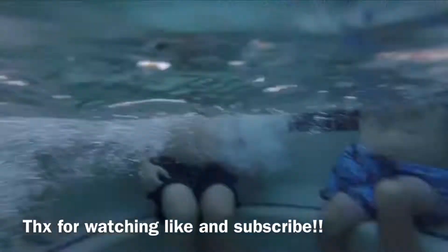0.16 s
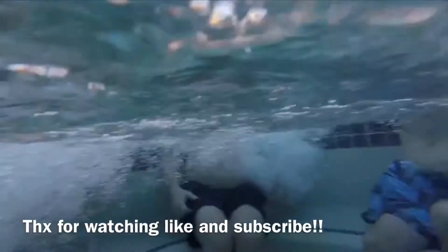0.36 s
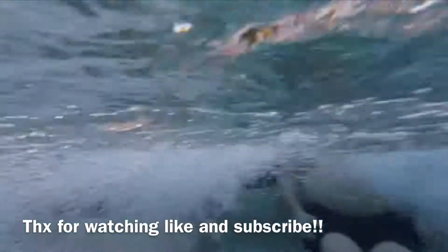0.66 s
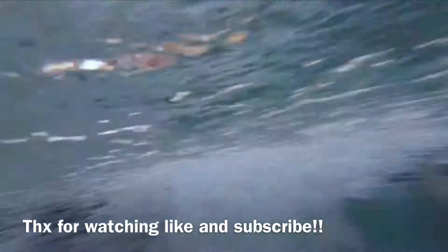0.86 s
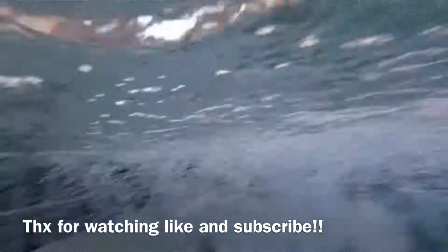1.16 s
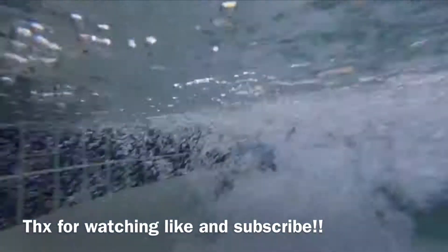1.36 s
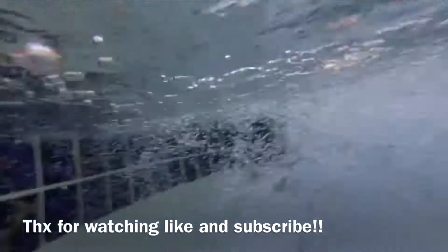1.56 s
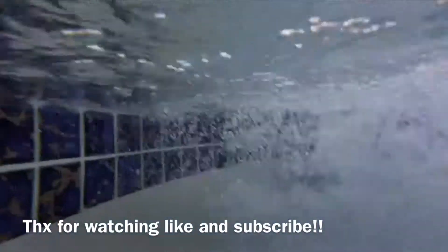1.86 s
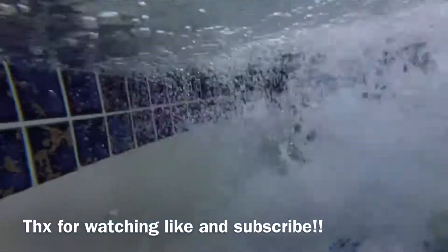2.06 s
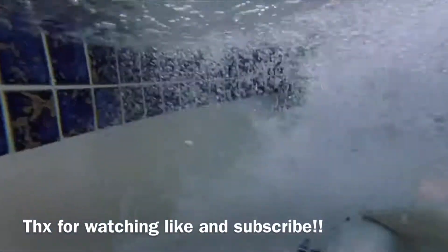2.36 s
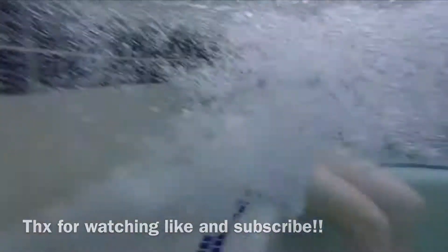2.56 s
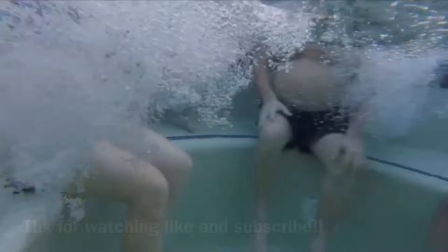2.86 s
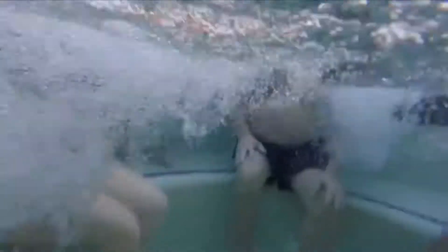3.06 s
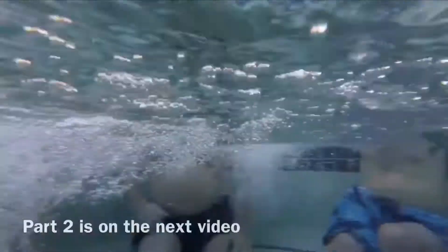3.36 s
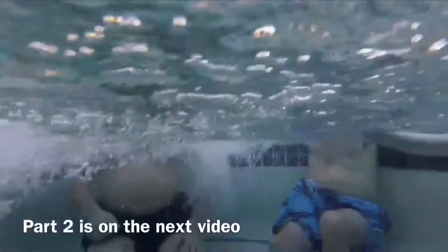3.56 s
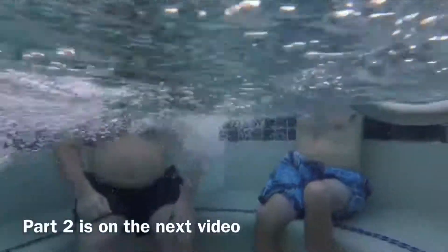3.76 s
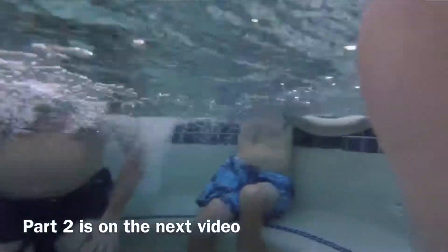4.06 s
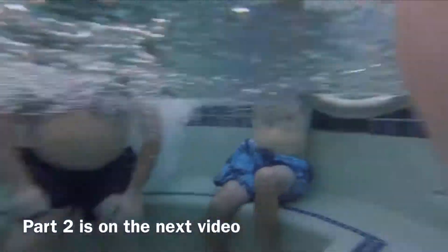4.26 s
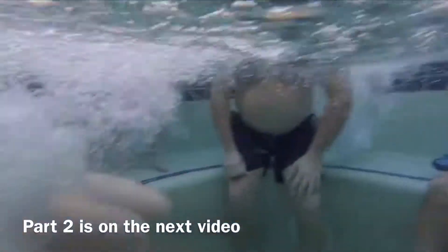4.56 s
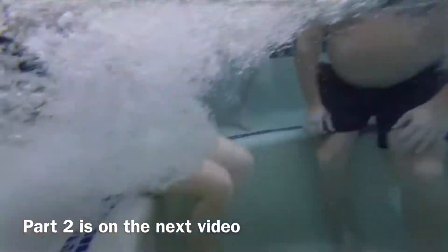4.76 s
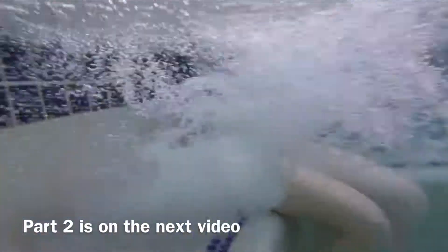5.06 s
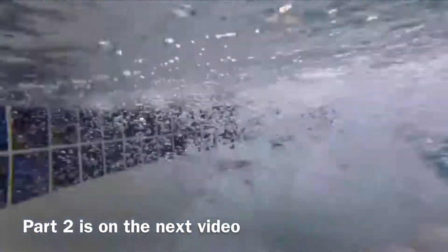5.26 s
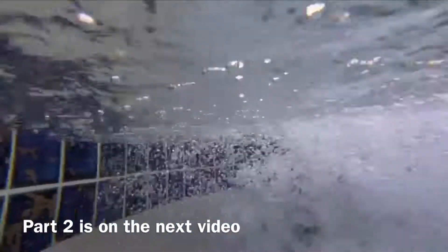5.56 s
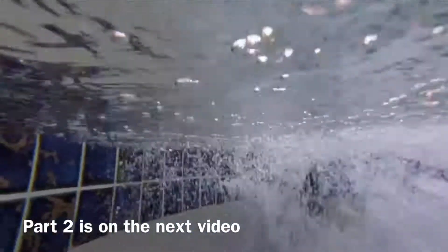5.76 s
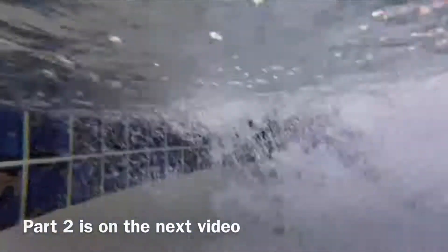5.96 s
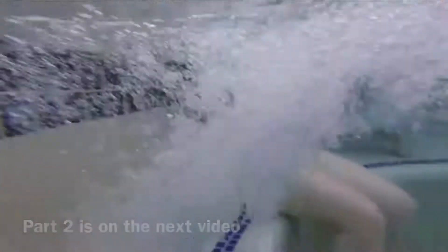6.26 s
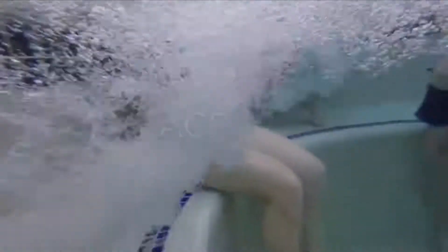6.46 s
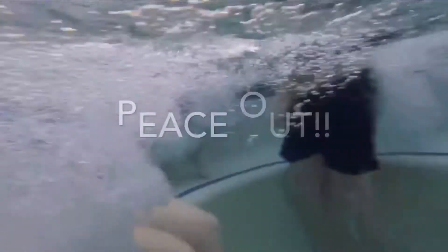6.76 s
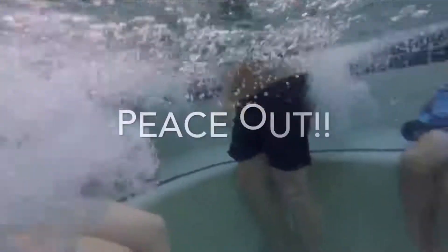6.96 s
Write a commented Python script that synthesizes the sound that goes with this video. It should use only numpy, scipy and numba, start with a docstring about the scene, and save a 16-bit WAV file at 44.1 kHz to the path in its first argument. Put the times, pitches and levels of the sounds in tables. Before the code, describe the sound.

Foamy water hisses briefly, a heavy plunge thumps, then hot tub jets rumble and gurgle underwater, deep and muffled with occasional knocks.

```python
"""In a hot tub, close to the jets, a microphone in a sealed waterproof case goes from air to water.
Foam, modelled as random kicks, hisses until a plunge, a leaking pressure step, shuts it out.
Below, a saturated oscillator throbs as the jet plume, and decaying sines churn as bubble clouds.
Resonators ring as air at the microphone port. Slow noise presses on the case, splatter bursts slap
it, damped sines knock, blip and boom, and small bubbles chirp outside it."""
import sys
import numpy as np
from scipy import signal
from scipy.fft import rfft, irfft, next_fast_len
from scipy.io import wavfile
from scipy.ndimage import uniform_filter1d, minimum_filter1d
from numba import njit

SR = 44100
rng = np.random.default_rng(int(sys.argv[2]) if len(sys.argv) > 2 else 0)


def transcribe(u):
    """Save the signal u as a 16-bit wav file named by the first command-line argument.

    u: samples, shape (n,) or (channels, n), limited to [-1, 1]; the rate is SR.
    q: integer samples, one column per channel.
    """
    v = np.clip(np.atleast_2d(u).T, -1, 1)
    q = np.round(v * 32767).astype(np.int16)
    wavfile.write(sys.argv[1], SR, q)


N = 314342
TIME = np.arange(N) / SR
UNDER_S = 0.156  # when the water closes over the microphone
# hold time [s] and share by which slow swells of ring and surge are evened out
EVEN_HOLD_S, EVEN_SHARE = 0.07, 0.62


def undb(db):
    """Logarithmic scale: decibels to amplitude gain."""
    return 10 ** (np.asarray(db) / 20)


def unit(x):
    """Power normalisation: scale to rms 1."""
    return x / np.sqrt(np.mean(x ** 2) + 1e-18)


def curves(table):
    """Linear interpolation: the columns of a table, joined by straight lines in time."""
    s, *columns = np.transpose(table)
    return [np.interp(TIME, s, column) for column in columns]


def swell(s, half_s):
    """Gaussian envelope: a smooth rise and fall around a moment, top 1."""
    return np.exp(-.5 * ((TIME - s) / half_s) ** 2)


def walk(rate):
    """Band-limited fluctuation: random levels held 1 / rate s and slewed twice; rms 1."""
    hold = max(int(SR / rate), 2)
    steps = np.repeat(rng.standard_normal(N // hold + 1), hold)
    slewed = uniform_filter1d(uniform_filter1d(steps, hold), hold)
    return unit(slewed[:N])


def steady(x, hold_s, share):
    """Power compression: even out a share of the swells that outlast the hold time; rms 1."""
    hold = max(int(hold_s * SR), 2)
    power = uniform_filter1d(uniform_filter1d(unit(x) ** 2, hold), hold // 2)
    return unit(x / np.maximum(power, 1e-4) ** (share / 2))


def colour(x, points, tilt_db=0):
    """Linear filtering: shape a spectrum by (Hz, dB) points and a tilt per octave; rms 1."""
    hz, db = np.transpose(points)
    size = next_fast_len(N, True)
    octave = np.log2(np.maximum(np.arange(size // 2 + 1) * SR / size, 1))
    # beyond the end points the gain falls 20 dB per octave
    outside = np.abs(octave - np.clip(octave, np.log2(hz[0]), np.log2(hz[-1])))
    gain = undb(np.interp(octave, np.log2(hz), db) + tilt_db * octave - 20 * outside)
    return unit(irfft(rfft(x, size) * gain, size)[:N])


@njit
def resonate(x, hz, width_hz):
    """Resonance: a state-variable band-pass with a moving centre, gain 1 there."""
    y, band, low = np.empty(len(x)), 0., 0.
    for i in range(len(x)):
        g, k = np.tan(np.pi * hz[i] / SR), width_hz / hz[i]
        v = (band + g * (x[i] - low)) / (1 + g * (g + k))
        band, low, y[i] = 2 * v - band, low + 2 * g * v, k * v
    return y


def pops(rate, spread_db):
    """Impulsive excitation: random pressure kicks, rate per second, many small and a few large."""
    size = undb(spread_db * np.minimum(rng.exponential(size=N), 5)) * rng.choice([-1, 1], N)
    return unit(size * (rng.random(N) < rate / SR))


def bubbles(low_hz, high_hz, cycles, glide, spread_db, count):
    """Volume pulsation: each bubble rings down 60 dB in some cycles, rising in pitch as it dies."""
    out = np.zeros(N + SR)
    for when, pitch, luck, sign in rng.random((count, 4)):
        hz = low_hz * (high_hz / low_hz) ** pitch
        turns = np.arange(min(int(cycles * SR / hz), SR)) * hz / SR
        age = turns / cycles
        size = np.sign(sign - .5) * undb(-spread_db * np.log(max(luck, np.exp(-4))))
        ring = 1000 ** -age * np.sin(2 * np.pi * turns * (1 + glide * age / 2))
        start = int(when * N)
        out[start:start + len(age)] += size * ring
    # small bubbles carry less energy each; the pressure slope evens them out
    return unit(np.diff(out[:N + 1]))


def muffle(x):
    """Transmission loss: the sealed case passes little treble."""
    case_hz = 2770
    return signal.sosfilt(signal.butter(6, case_hz, fs=SR, output="sos"), x)


# spectrum of the foam in air: (frequency [Hz], gain [dB])
FOAM_SPECTRUM = [(60, 5), (250, -12.5), (600, -18.5), (1100, -29.5), (1350, -30), (1530, -21), (1850, -35),
                 (2400, -34.5), (3500, -44), (6500, -38), (9300, -38), (11000, -53), (15000, -66)]


def open_air():
    """Superposed bursts: foam hisses on the surface, slightly louder as the case nears it."""
    level_db = -22.5 + 0.43 * np.minimum(TIME / UNDER_S, 1)
    return colour(pops(9000, 2.7), FOAM_SPECTRUM) * undb(level_db)


# spectrum of the slow water pressure: (frequency [Hz], gain [dB])
SURGE_SPECTRUM = [(5, -4.5), (14, -5.5), (30, -5), (48, -2.5), (70, -10.5), (140, -42)]
# heavy eddies shove the case: (time [s], half length [s], gain [dB])
EDDY_SHOVES = [(0.156, .02, 8), (0.447, 0.026, 8), (0.58, 0.046, 6), (0.764, 0.028, 7), (0.862, 0.018, 9.5),
               (1.115, 0.017, 11), (1.46, 0.046, 6.5), (2.047, .06, 5.5), (3.346, 0.14, 3.5),
               (3.8, .05, 10), (5.115, 0.044, 5.5), (5.942, 0.057, 8.5)]


def surge():
    """Turbulent pressure: low noise presses on the case, coming and going and rising in eddies."""
    level_db = -21 + 2 * walk(6.3)
    level_db = level_db + sum(gain_db * swell(s, half_s) for s, half_s, gain_db in EDDY_SHOVES)
    pressure = colour(rng.standard_normal(N), SURGE_SPECTRUM)
    return steady(pressure, EVEN_HOLD_S, EVEN_SHARE) * undb(level_db)


# clusters of small bubbles break loose from the case: (time [s], half length [s], level [dB])
BUBBLE_CLUSTERS = [(0.418, .006, -38), (1.125, .01, -37)]


def clusters():
    """Volume pulsation heard through a wall: small bubbles chirp together outside the case."""
    chirps = muffle(bubbles(1200, 1850, cycles=30, glide=.1, spread_db=-0.5, count=4000))
    return chirps * sum(undb(db) * swell(s, half_s) for s, half_s, db in BUBBLE_CLUSTERS)


# the case booms softly as it is handled: (time [s], level [dB])
CASE_BUMPS = [(0.287, -30), (0.355, -19.5), (0.405, -18.5), (0.849, -11.5), (1.063, -19.5), (1.116, -16)]


def bumps(hz, t60):
    """Modal decay: a soft push sets the lowest mode of the case ringing, down 60 dB in t60 s."""
    out = np.zeros(N)
    for s, db in CASE_BUMPS:
        t = np.maximum(TIME - s, 0)
        fade = undb(db - 60 * np.minimum(t / t60, 2))
        out += fade * np.sin(2 * np.pi * hz * t) * (1 - np.exp(-t / .004))
    return out


# knocks and bubble pops on the case, and short blips of the ring at the port:
# (time [s], ring level [dB], ring frequency [Hz], ring 60 dB decay [s], click re ring [dB])
KNOCKS_AND_BLIPS = [(0.141, -8, 1160, 0.0089, -23), (0.158, 2, 454, 0.0053, -18),
                    (0.163, -1.5, 165, 0.046, -19), (0.169, 2, 384, 0.012, -13),
                    (0.17, -10, 2800, 0.0092, -20), (0.173, -16, 220, 0.012, -5),
                    (0.1778, 11, 1620, 0.0044, -19), (0.1865, 0, 1350, 0.0099, -36),
                    (0.190, 7, 258, 0.0065, -54), (0.202, -27, 3200, 0.0068, -23),
                    (0.212, -29, 3300, .006, -13), (0.226, -17, 1310, 0.0069, -24),
                    (0.254, -2.5, 1500, 0.011, -38), (0.31, -18, 1320, 0.042, -51),
                    (0.370, -29, 1410, .008, -18), (0.406, -9, 2330, 0.01, -21),
                    (0.407, -11, 760, .014, -40), (0.409, -10, 1420, 0.02, -45),
                    (0.850, -14.5, 1790, 0.0069, -7), (1.0514, -24, 2830, 0.0056, -13),
                    (1.118, -17, 1590, 0.026, -38), (1.13, -17.5, 1440, 0.023, -39),
                    (1.3174, -30, 2700, 0.0052, -11.5), (1.544, -19, 1470, 0.02, -26),
                    (2.113, -20, 1570, 0.018, -50), (2.8106, -18, 2660, 0.0099, -29),
                    (2.835, -21, 1954, 0.018, -26.5), (2.837, -10.5, 2580, 0.012, -35),
                    (2.836, -19, 4150, 0.0056, -28.5), (2.908, -9.5, 1125, 0.024, -26),
                    (3.462, -28.5, 1600, 0.018, -22), (4.184, -11, 450, 0.013, -32.5),
                    (4.272, -15, 1206, .04, -45.5), (4.283, -10, 640, 0.032, -44),
                    (4.294, 3, 155, 0.024, -34), (4.302, -13, 1070, 0.044, -45),
                    (4.877, -25, 1650, .022, -37), (4.885, -22, 1570, .023, -40)]


def knocks_and_blips():
    """Impulse response: a click and a muffled damped ring with a quicker, weaker overtone."""
    rings, clicks, t = np.zeros(N), np.zeros(N), TIME[:SR // 10]
    onset = 1 - np.exp(-(t / 0.00055) ** 2)
    click = np.sin(2 * np.pi * 3200 * t) * np.exp(-t / 0.00016)
    for s, db, hz, t60, click_db in KNOCKS_AND_BLIPS:
        fade = np.exp(-np.log(1000) * t / t60)
        overtone = undb(-17.0) * fade ** 2 * np.sin(2 * np.pi * 1.4 * hz * t)
        ring = fade * np.sin(2 * np.pi * hz * t) + overtone
        span = slice(int(s * SR), int(s * SR) + len(t))
        rings[span] += undb(db) * ring * onset
        clicks[span] += undb(db + click_db) * click
    return muffle(rings) + clicks


# spectrum of the splatter before tilt: (frequency [Hz], gain [dB])
SLOSH_SPECTRUM = [(40, -9.5), (180, 12), (600, -2), (1500, -7.5), (2700, -17), (3800, -36), (5000, -50.5),
                  (8000, -47.5), (13000, -74)]
# water slapping over the case: (time [s], half length [s], level [dB], tilt [dB per octave])
WATER_SLAPS = [(0.171, 0.008, -8, 1), (0.37, 0.016, -32.5, 1.5), (0.405, 0.0055, -19, 1.5),
               (0.85, 0.013, -26, 3.5), (0.795, 0.027, -34, 1), (1.106, 0.024, -30, 1.7),
               (2.707, 0.014, -10.5, -12), (2.16, 0.014, -14, -11), (3.078, 0.03, -17, -7),
               (3.187, 0.024, -24, -2.5), (4.29, 0.0086, -16.5, -5), (4.658, 0.028, -16.5, -11.5),
               (5.006, 0.033, -18, -10.5)]


def sloshes():
    """Spectral tilt: short swells of dense splatter over the case; the dull ones are low gulps."""
    splatter = pops(6000, 4.7)
    out = np.zeros(N)
    for s, half_s, db, tilt_db in WATER_SLAPS:
        out += colour(splatter, SLOSH_SPECTRUM, tilt_db) * undb(db) * swell(s, half_s)
    return out


def plunge(s, db, relax_s):
    """Pressure relaxation: the water seals the port with one heavy thump that leaks away."""
    t = np.maximum(TIME - s, 0)
    return -undb(db) * (1 - np.exp(-(t / 0.0014) ** 2)) * np.exp(-t / relax_s)


def cavity(hz, width_hz):
    """Cavity resonance: trapped air kicked by bursting bubbles; two passes give steep flanks."""
    return resonate(resonate(pops(2400, 2.4), hz, width_hz), hz, width_hz)


# a pocket of air beside the port grows and shrinks: (time [s], ring frequency [Hz])
POCKET_PITCH = [(0.22, 1475), (0.42, 1334), (0.7, 1226), (1.2, 1212), (1.9, 1230), (2.9, 1258),
                (3.08, 1324), (3.3, 1233), (4.6, 1230), (4.98, 1290), (5.15, 1447), (5.24, 1235),
                (5.42, 878), (5.57, 1227), (7.1, 1178)]


def pocket_pitch():
    """Cavity tuning: the ring of the pocket [Hz] glides as its size changes."""
    return curves(POCKET_PITCH)[0]


def absorb(x, pocket_hz, width_hz):
    """Resonant absorption: just above its own ring the pocket takes out a share of the sound."""
    # the pocket shifts at 5 s, and then absorbs a smaller share
    share = np.interp(TIME, [5, 5.5], [0.64, 0.3])
    return x - share * resonate(x, 1.25 * pocket_hz, width_hz)


# resonances of the air at the port, at the pocket's usual pitch:
# (frequency [Hz], width of each pass [Hz], level [dB])
PORT_RESONANCES = [(1038.3, 87, -3.5), (1134, 66, 3)]
# level of the ring at the port before its flutter: (time [s], level [dB])
PORT_LEVEL = [(0.2, -34.5), (0.45, -29), (0.78, -23), (0.93, -31.5), (1.08, -28.5), (1.35, -30),
              (1.95, -22), (2.75, -24.5), (2.95, -21), (3.3, -23), (3.6, -22), (4.25, -24), (4.48, -26.5),
              (4.96, -20.5), (5.02, -29), (5.15, -26), (5.26, -39), (5.44, -54), (5.59, -23.5), (5.85, -29),
              (6.1, -27), (7.13, -29)]


def port_ring(pocket_hz, swirl_db):
    """Coupled resonance: bubbles shake the port air, whose modes are pulled along by the pocket."""
    # the pocket is heard through the port, so it fades as its pitch strays
    pocket = resonate(cavity(pocket_hz, 147.), np.full(N, 1200.), 310.)
    pull = (pocket_hz / 1238.6) ** 0.54  # relative to the pocket's usual ring in Hz
    modes = sum(undb(db) * cavity(hz * pull, float(width_hz)) for hz, width_hz, db in PORT_RESONANCES)
    level_db = curves(PORT_LEVEL)[0] + swirl_db + 1.3 * walk(45)
    return steady(modes + undb(-4) * pocket, EVEN_HOLD_S, EVEN_SHARE) * undb(level_db)


# spectrum of the large bubbles: (frequency [Hz], gain [dB])
LARGE_SPECTRUM = [(70, -26.5), (115, 2.5), (190, -1), (300, -5), (480, -8.5), (660, -12), (820, -8.5),
                  (920, -11), (1250, -11.5), (1450, -31.5), (1800, -53)]


def gurgle(pocket_hz, level_db):
    """Volume pulsation at low pitch: large bubbles gurgle, and single ones plop out of them."""
    dense = bubbles(109.9, 1397, cycles=25.0, glide=.15, spread_db=-0.5, count=11000)
    dense = unit(dense + pops(4300, 0.95))
    plops = bubbles(150, 1300, cycles=48, glide=.14, spread_db=1.0, count=1100)
    large = absorb(dense + undb(-6.5) * plops, pocket_hz, 180.)
    return colour(large, LARGE_SPECTRUM) * undb(level_db)


# spectrum of the fine bubbles: (frequency [Hz], gain [dB])
FINE_SPECTRUM = [(1100, -6.5), (1520, -4), (1750, -2.5), (2000, -5), (2240, 1), (2420, -10.5),
                 (2830, -12.5), (3050, -26.5), (3220, -26), (3420, -36), (3700, -36), (4800, -51.5),
                 (7300, -34), (10000, -39), (11500, -70.5)]


def fizz(pocket_hz, level_db):
    """Volume pulsation at high pitch: fine bubbles ring and burst in a dense fizz."""
    fine = bubbles(1300, 3460, cycles=26, glide=0.17, spread_db=-1.0, count=12000)
    fine = absorb(fine + undb(4.0) * pops(6000, 2.3), pocket_hz, 620.)
    return colour(fine, FINE_SPECTRUM) * undb(level_db)


# bubble cloud, which the case drifts in and out of:
# (time [s], large bubble level [dB], fine bubble level [dB])
CLOUD_LEVELS = [(0.22, -32, -48), (0.52, -31, -44.5), (0.8, -25, -42), (0.93, -33.5, -48),
                (1.0, -29.5, -45), (1.2, -31.5, -45.5), (1.41, -32.5, -44), (1.5, -24, -40.5),
                (1.9, -23, -41), (2.55, -24.5, -41), (2.95, -21.5, -38), (3.42, -24.5, -41.5),
                (3.9, -20, -38), (4.08, -23, -41.5), (4.5, -23.5, -42), (4.9, -20.5, -38), (5.15, -21, -41),
                (5.4, -22, -37.5), (5.85, -23, -41.5), (7.13, -21.5, -39)]
# gushes of bubbles sweep past:
# (time [s], half length [s], large bubble gain [dB], fine bubble gain [dB])
BUBBLE_GUSHES = [(0.378, 0.026, 7.5, 6), (0.639, 0.034, 10, 1), (0.838, 0.032, 7.5, 7.5),
                 (2.138, 0.076, 3.5, 3.5), (2.347, 0.052, 4, 2.5), (3.095, 0.035, 3.5, -0.5),
                 (3.186, 0.015, 8, 5), (3.578, 0.02, 2.5, 6), (4.276, 0.037, 6, 5), (5.61, 0.078, 4.5, 3),
                 (6.078, 0.031, 4, 5.5), (6.298, 0.13, 2, 2.5), (6.519, 0.021, 2.5, 1.5),
                 (6.996, 0.03, 3, 3.5)]


def churn():
    """Turbulent modulation: gurgle, fizz and port ring swell together, the bubbles also in gushes."""
    swirl_db = 0.49 * walk(12)
    large_db, fine_db = [level_db + swirl_db for level_db in curves(CLOUD_LEVELS)]
    for s, half_s, large_gain_db, fine_gain_db in BUBBLE_GUSHES:
        gush = swell(s, half_s)
        large_db += large_gain_db * gush
        fine_db += fine_gain_db * gush
    pocket_hz = pocket_pitch()
    cloud = gurgle(pocket_hz, large_db) + fizz(pocket_hz, fine_db) + port_ring(pocket_hz, swirl_db)
    cloud = absorb(cloud, pocket_hz, 190.)  # the narrow core of the absorption
    return cloud * undb(0.7 * walk(30))


# jet plume before its stalls: (time [s], pulsation frequency [Hz], level [dB])
PLUME_PULSATION = [(0.3, 80.17, -34), (0.47, 71.79, -14.5), (0.72, 78.15, -15.5), (0.83, 77.1, -9.5),
                   (0.98, 84.76, -16.5), (1.35, 83.7, -13.5), (1.56, 77.79, -11.5), (1.85, 79.82, -10.8),
                   (2.06, 71.3, -14.5), (2.2, 80.3, -10.5), (2.5, 77.12, -9.5), (2.85, 82.22, -12),
                   (3.1, 76.76, -11), (3.48, 73.98, -11.5), (3.95, 84.06, -12), (4.27, 92.46, -11),
                   (4.6, 77.96, -11), (5.15, 78.28, -11.5), (5.6, 82.73, -9.5), (5.9, 79.45, -12),
                   (6.04, 71.5, -10), (6.2, 79.47, -9.5), (6.45, 84.33, -11), (6.7, 74.34, -10.5),
                   (7.13, 77.8, -10.5)]
# the plume stalls: (time [s], half length [s], depth [dB])
PLUME_STALLS = [(0.577, 0.019, 4), (0.924, 0.032, 19), (1.076, 0.024, 11), (1.173, 0.0081, 10),
                (1.249, 0.0081, 7), (1.462, 0.018, 6.5), (1.651, 0.007, 9.5), (1.917, 0.011, 9),
                (1.99, 0.01, 3.5), (2.39, 0.011, 12), (2.71, 0.024, 14), (3.054, 0.014, 8),
                (3.15, 0.0098, 11), (3.35, 0.019, 6), (3.542, 0.008, 13), (3.742, 0.025, 9),
                (4.342, .02, 10.5), (4.43, 0.011, 20), (4.876, 0.015, 5), (5.09, 0.039, 6),
                (5.593, 0.0064, 15), (5.93, 0.04, 7), (6.233, 0.0081, 10), (6.332, 0.012, 11),
                (6.68, 0.0085, 12), (6.867, 0.0098, 8)]


def plume():
    """Saturated self-oscillation: the air-laden jet throbs and booms, slips out of step and stalls."""
    slip_per_s, slip_s = 4, .026  # how often the throb slips, and how long a slip takes
    pitch_wander = 0.02  # rms share of the pitch
    ceiling = 1.9  # the swing at which the plume saturates, relative to its rms
    hz, level_db = curves(PLUME_PULSATION)
    # each slip moves the phase by up to half a turn
    slips = (rng.random(N) < slip_per_s / SR) * rng.uniform(-.5, .5, N)
    slips = uniform_filter1d(slips, max(int(slip_s * SR), 2))
    turns = np.cumsum(hz * (1 + pitch_wander * walk(24)) / SR + slips)
    throb = unit(np.sin(2 * np.pi * turns))
    boom_spectrum = [(42, -15), (60, -3.0), (80, -2.5), (103, -1.5), (126, -19.5)]  # (Hz, dB)
    boom = colour(rng.standard_normal(N), boom_spectrum)
    swing = unit(throb + undb(-5) * boom)
    size = np.abs(signal.hilbert(swing, next_fast_len(N)))[:N]
    saturated = swing / np.hypot(size, ceiling)
    # brief flutters of the swing, at most 6.5 dB deep
    falter_db = np.minimum(4 * np.maximum(walk(45), 0) ** 2, 6.5)
    stall_db = sum(depth_db * swell(s, half_s) for s, half_s, depth_db in PLUME_STALLS)
    return unit(saturated * undb(-falter_db)) * undb(level_db - stall_db)


def scene():
    """Superposition: foam until the water closes, jets and bubbles after it, and sounds close by."""
    under = np.clip((TIME - UNDER_S) / 0.0044, 0, 1)
    # after the plunge the jets take 0.061 s to come through
    clearing = np.clip((TIME - UNDER_S) / 0.061, 0, 1) ** 2
    air = (1 - under) * open_air()
    close = clusters() + bumps(hz=198.9, t60=0.26) + knocks_and_blips() + sloshes()
    close = close + plunge(s=0.193, db=-2.0, relax_s=0.013)
    water = (churn() + plume()) * clearing
    return (air + surge() + close + water)[None]


def record(dry):
    """Peak limiting and band limiting: duck the loudest peaks, ease both ends, cut above 15 kHz."""
    hold = SR // 100
    gain = np.minimum(1, 0.98 / (np.abs(dry) + 1e-9))
    gain = uniform_filter1d(minimum_filter1d(gain, hold), hold)
    gain = uniform_filter1d(gain, hold // 3)
    ease = np.sin(np.pi / 2 * np.minimum(np.minimum(TIME, TIME[-1] - TIME) / .005, 1)) ** 2
    top_cut = signal.ellip(8, .2, 70, 15000, fs=SR, output="sos")
    return signal.sosfilt(top_cut, dry * gain * ease)


dry = scene()
out = record(dry)
transcribe(out)
```